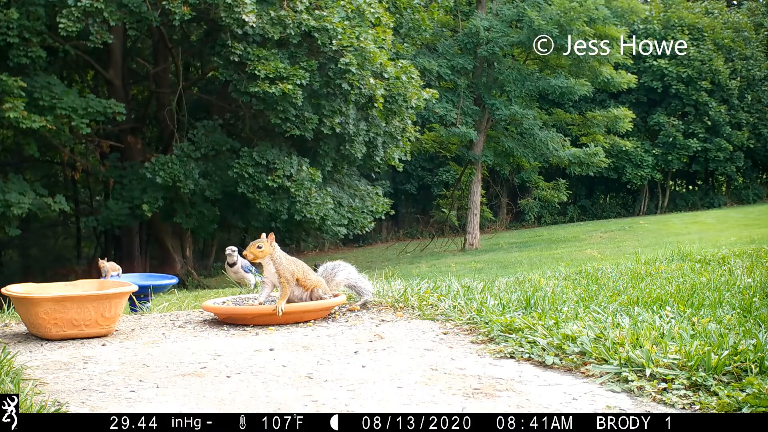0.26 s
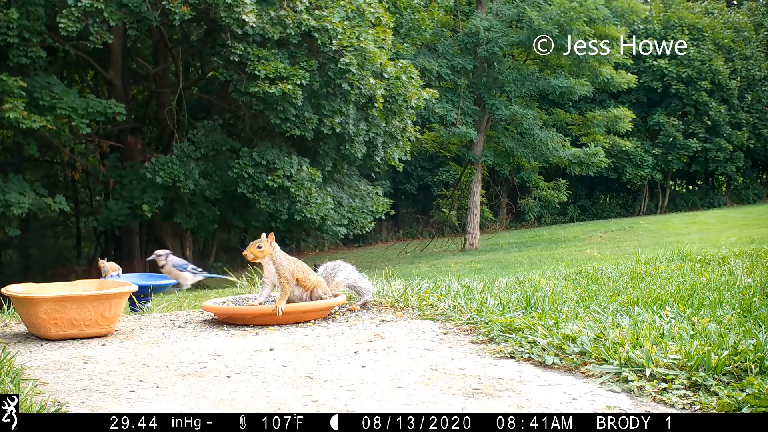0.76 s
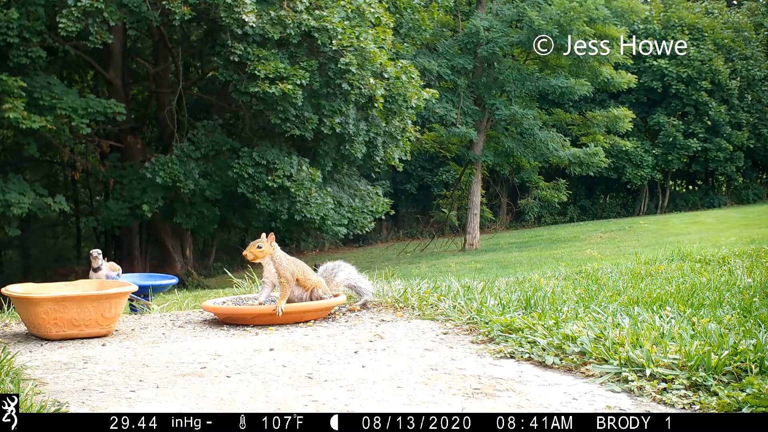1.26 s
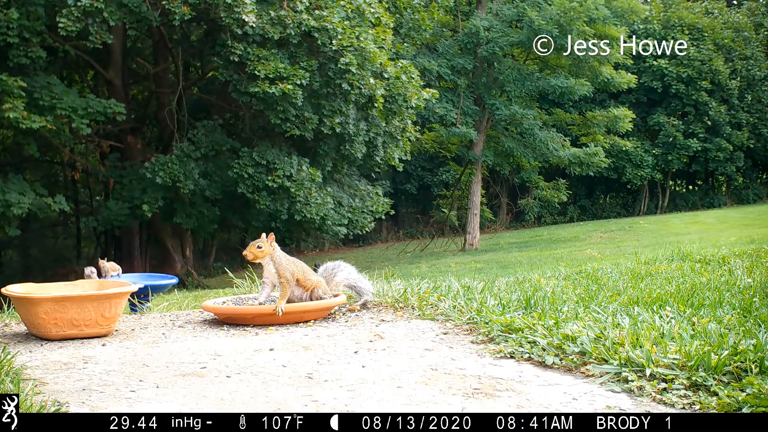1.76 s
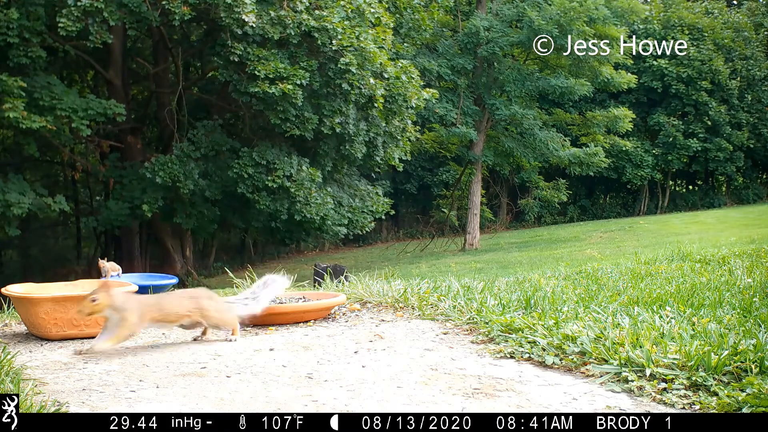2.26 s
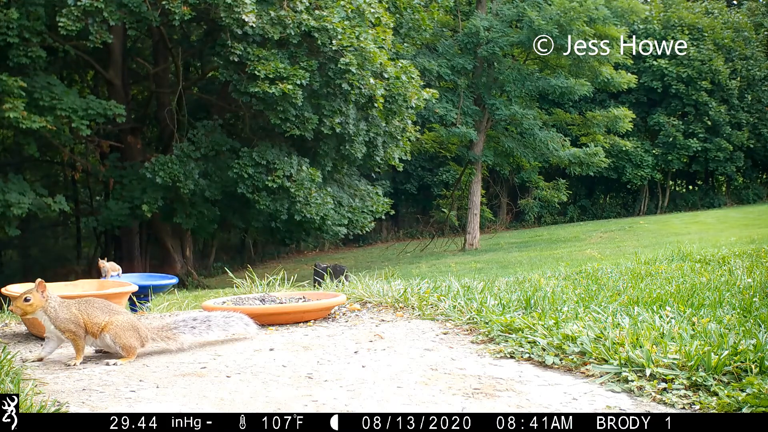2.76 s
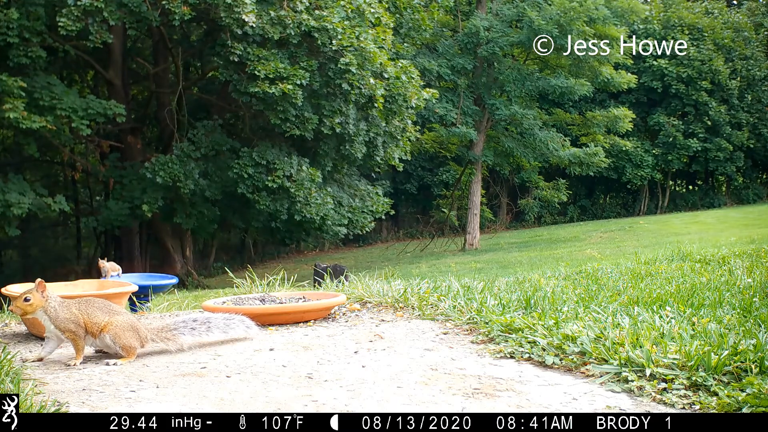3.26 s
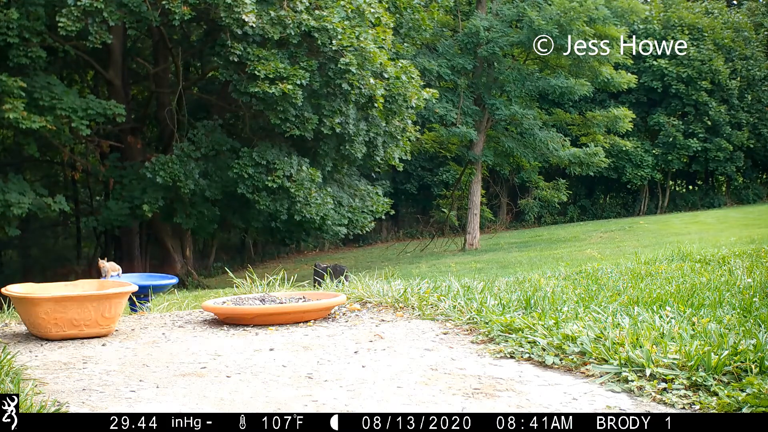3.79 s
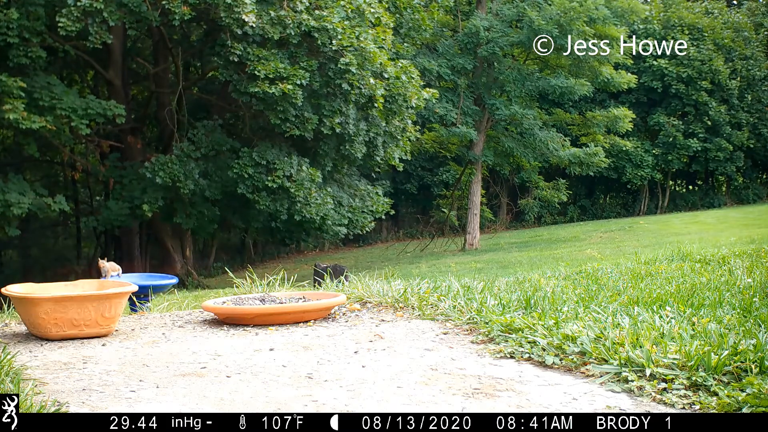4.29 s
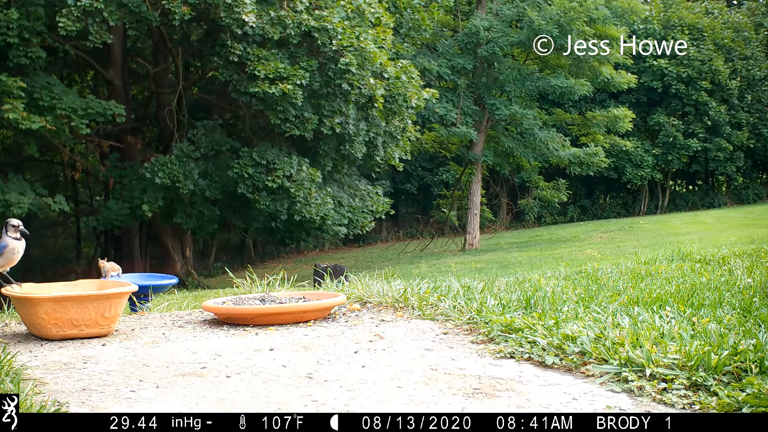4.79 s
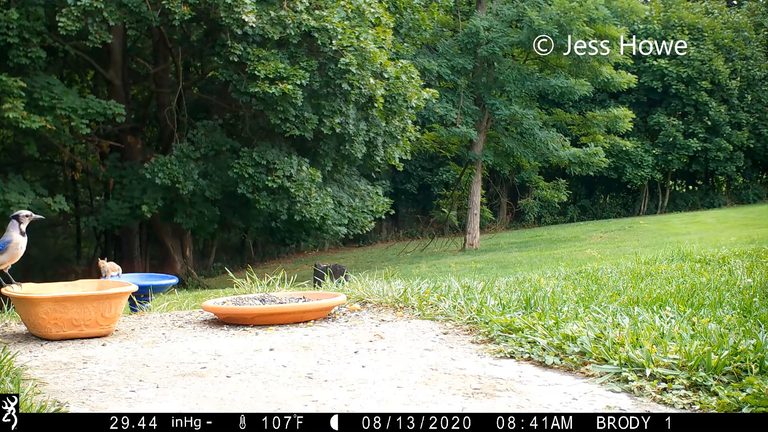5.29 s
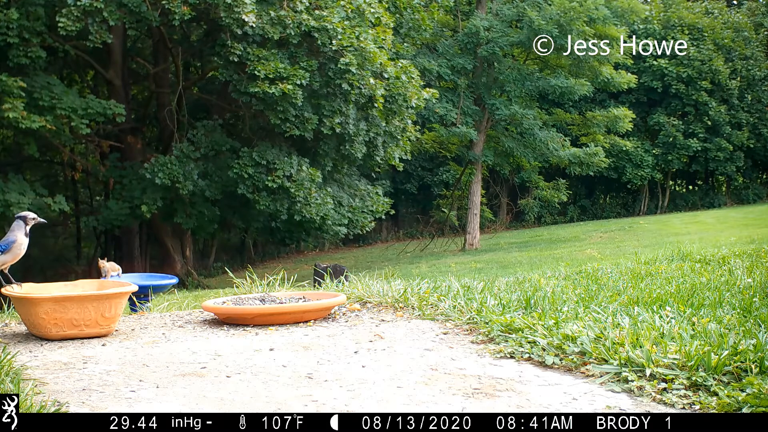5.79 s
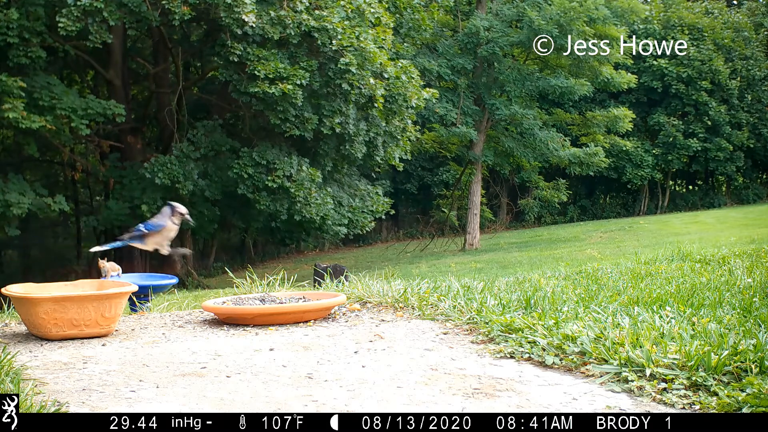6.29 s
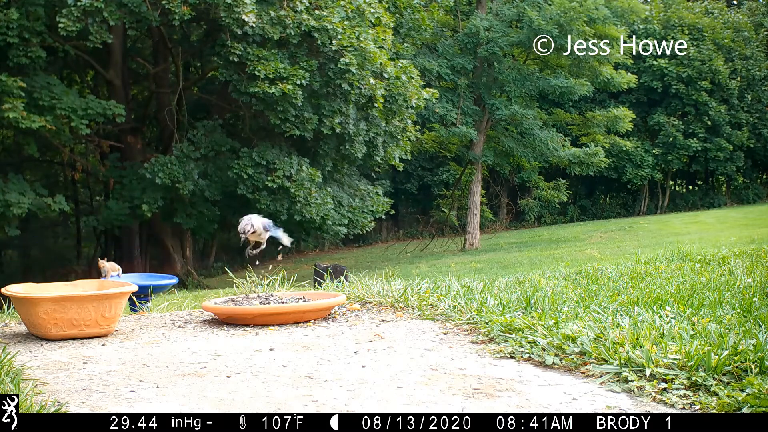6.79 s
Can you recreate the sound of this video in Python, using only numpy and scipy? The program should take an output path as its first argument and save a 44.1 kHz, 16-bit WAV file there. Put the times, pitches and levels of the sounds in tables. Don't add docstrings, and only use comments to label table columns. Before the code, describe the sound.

A quiet yard at a wood's edge, heard through a small, easily overloaded microphone. At 0 seconds the tail of a harsh jay scream is already sounding, ending abruptly by 0.1 and leaving a woody echo. From 0.2 to 1.5 a distant songbird whistles thin, down-stepping phrases, softened by echo. A faint far-engine throb swells near 1.7. At 2.0 to 2.5 soft throaty clucks and quick dry claw scratches come from the bowls, with another low note at 2.65. At 3.2 the jay screams again for a third of a second, starting hesitantly and swelling, with a tiny thump inside. Distant whistles return from 3.75 to 4.4 and 5.5 to 6.7; the engine murmurs weakly around 5.2. After a slight scratch and stutter, the loudest, crackling scream hits at 6.43 to 6.74. Another scratch and faint whistle close at 7. Leaves and traffic hush throughout.

```python
import sys
import numpy as np
from scipy import signal
from scipy.fft import rfft, irfft
from scipy.io import wavfile
from scipy.ndimage import uniform_filter1d

SR = 44100
rng = np.random.default_rng(int(sys.argv[2]) if len(sys.argv) > 2 else 0)


def ratio_of_db(decibels):
    return 10 ** (np.asarray(decibels, float) / 20)


def generate_wav(signal):
    frames = np.transpose(np.atleast_2d(signal))
    scaled = np.clip(frames, -1, 1) * 32767
    pcm = np.round(scaled).astype(np.int16)
    wavfile.write(sys.argv[1], SR, pcm)


N = 310904
LEAD = SR // 2

# start in seconds, end in seconds.
SPANS_S = [
    (-.27, .078),
    (3.2295, 3.568),
    (6.4345, 6.74),
]


def colour(x, points, share=1):
    hz, db = np.transpose(points)
    f = np.maximum(np.fft.rfftfreq(len(x), 1 / SR), 1)
    gain = ratio_of_db(share * np.interp(np.log(f), np.log(hz), db))
    return irfft(rfft(x) * gain, len(x))


def unit(x):
    return x / np.sqrt(np.mean(x ** 2))


def band(hz, width, size):
    f = np.fft.rfftfreq(size, 1 / SR)
    spectrum = rfft(rng.standard_normal(size)) / np.sqrt(1 + ((f - hz) / width) ** 4)
    return unit(irfft(spectrum, size))


def add(out, s, x):
    i = int(s * SR) + LEAD
    out[i:i + len(x)] += x[:len(out) - i]


def wood(x, t60_s, rise_s):
    t = np.arange(int(1.2 * SR)) / SR
    trunks = ratio_of_db(band(0, 71, len(t)))
    leaves = [(500, -7), (3300, -6.5), (4200, 3.5), (5000, -6), (6500, -3.5), (8000, -15.5),
              (10000, -32.5), (16000, -51)]
    tail = colour(rng.standard_normal(len(t)), leaves) * trunks
    tail = tail * ratio_of_db(-60 * t / t60_s) * (1 - np.exp(-t / rise_s))
    return signal.fftconvolve(x, tail / np.sqrt(np.sum(tail ** 2)))[:len(x)]


def murmur():
    # frequency in Hz, level in dB per Hz.
    air_spectrum = [(12, -47), (20, -22.5), (119, -4.5), (232, -3), (500, -4), (985, -3.5), (2760, -14.5),
                    (3800, -24), (4810, -31), (7300, -35.5), (8640, -46), (15500, -48.5)]
    return unit(colour(rng.standard_normal(N), air_spectrum)) * ratio_of_db(-51.5 + .5 * band(0, 1.8, N))


def engine(t):
    # centre in seconds, half length in seconds, level in dB.
    swells = [
        (1.664, .13, -46),
        (4.45, 0.11, -55.5),
        (5.243, 0.53, -59),
    ]
    swell = ratio_of_db(-61.5) + sum(ratio_of_db(db) * np.exp(-((t - s) / half_s) ** 2) for s, half_s, db in swells)
    return band(270, 90, N) * swell * ratio_of_db(2.5 * band(0, 25, N) - 4.5)


def whine(t):
    whine_hz, flip_hz, whine_db = 7797.5, 59.5, -75.5
    flips = np.clip(8 * np.sin(np.pi * flip_hz * (t - .0093)), -1, 1)
    return np.sqrt(2) * ratio_of_db(whine_db) * flips * np.sin(2 * np.pi * whine_hz * t)


def yard():
    t = np.arange(N) / SR
    return murmur() + engine(t) + whine(t)


def songbird():
    # start in seconds, length in seconds, pitch in Hz, level in dB.
    song = [(0.2, 0.13, 2850, -56.5), (0.372, 0.073, 2153, -49.5), (0.331, 0.18, 3880, -79.5),
            (0.512, 0.088, 3340, -65), (0.57, 0.15, 2677, -61), (0.705, 0.14, 2062, -57.5),
            (0.965, 0.19, 3854, -82), (1.132, 0.14, 3380, -70), (1.15, 0.21, 2790, -62.5),
            (1.288, 0.07, 2227, -55), (1.396, 0.08, 2180, -59), (3.75, 0.12, 2750, -56.5),
            (3.855, 0.16, 2128, -59), (3.955, 0.28, 3370, -61), (4.197, 0.11, 2846, -66.5),
            (4.327, 0.058, 2200, -59.5), (5.547, 0.15, 3900, -77), (5.698, 0.074, 3370, -71),
            (5.74, 0.18, 2810, -58), (5.92, 0.14, 2183, -55), (5.981, 0.38, 3866, -82.5),
            (6.192, 0.1, 2747, -57.5), (6.24, 0.51, 2842, -60), (6.33, 0.31, 2065, -59),
            (6.967, 0.075, 2710, -56.5)]
    # start in seconds, length in seconds, pitch in Hz, level in dB.
    risers = [
        (0.453, 0.16, 1383, -60),
        (1.157, 0.053, 1646, -59.5),
    ]
    high_slide, low_slide, riser_slide = -0.3, -0.077, 1.0
    whistles = [(*n, high_slide if n[2] > 3000 else low_slide) for n in song]
    whistles += [(*n, riser_slide) for n in risers]
    out = np.zeros(N + LEAD)
    for s, length_s, pitch_hz, db, slide in whistles:
        u = np.linspace(0, 1, int(length_s * SR))
        high = pitch_hz > 3600
        buzz_hz = 55 if high else 12
        hz = pitch_hz * (1 + slide * length_s * (u - .5)) + buzz_hz * band(0, 82, len(u))
        shape = np.sin(np.pi * u ** 0.85) ** 0.38 * ratio_of_db(1.7 * band(0, 30, len(u)))
        add(out, s, ratio_of_db(db + 5 + 10 * high) * shape * np.sin(2 * np.pi * np.cumsum(hz) / SR))
    return out + ratio_of_db(-2) * wood(out, 0.72, 0.0074)


def throat_notes(out):
    # start in seconds, length in seconds, pitch in Hz, level in dB.
    chucks = [
        (2.011, 0.04, 762, -47),
        (2.081, 0.057, 750, -52),
        (2.11, 0.042, 1370, -58.5, ),
        (2.652, 0.052, 559, -55),
    ]
    harmonics = [(1, -5), (2, -5), (3, 3), (4, -7), (5, -12)]  # (multiple, dB)
    for s, length_s, hz, db in chucks:
        u = np.arange(int(length_s * SR)) / SR
        note = sum(ratio_of_db(g_db) * np.sin(2 * np.pi * k * hz * u) for k, g_db in harmonics if k * hz < 4500)
        swell = np.sin(np.pi * u / length_s) * ratio_of_db(2 * band(0, 114, len(u)))
        add(out, s, ratio_of_db(db) * note * swell)


def scuffle(out):
    # start in seconds, length in seconds, centre in Hz, level in dB.
    scratches = [(2.026, 0.028, 2180, -44.5), (2.075, 0.055, 2700, -51), (2.107, .012, 4000, -64),
                 (2.117, 0.042, 1410, -47.5), (2.15, 0.019, 2500, -56), (2.202, 0.013, 3480, -64),
                 (2.223, 0.0184, 2580, -53), (2.314, 0.041, 2160, -53), (2.405, 0.033, 1790, -50),
                 (2.474, 0.013, 2500, -65), (6.183, 0.023, 3494, -56), (6.983, 0.052, 2400, -45.5)]
    for s, length_s, hz, db in scratches:
        size = int(length_s * SR)
        swell = np.hanning(size) ** .5 * ratio_of_db(1.1 * band(0, 200, size))
        add(out, s, ratio_of_db(db) * band(hz, 0.39 * hz, size) * swell)


def jolt(out):
    # start in seconds, length in seconds, thump in dB, fizz in dB.
    jolt_row = (3.412, .016, -38, -62)
    s, length_s, thump_db, fizz_db = jolt_row
    size = int(length_s * SR)
    thump = np.cos(2 * np.pi * 90 * (np.arange(size) - size / 2) / SR)
    fizz = band(15000, 2000, size)
    add(out, s, np.hanning(size) * (ratio_of_db(thump_db) * thump + ratio_of_db(fizz_db) * fizz))


def feeder():
    out = np.zeros(N + LEAD)
    throat_notes(out)
    scuffle(out)
    out = colour(out, [(3500, -1), (6000, -5), (9000, -17)])
    jolt(out)
    return out


def stutter(out):
    # start in seconds, level in dB, length in seconds, pitch in Hz.
    catches = [
        (3.2243, -29, .0035, 2050),
        (6.4247, -24, .004, 2150),
        (6.4303, -17, .004, 2200),
    ]
    for s, db, length_s, hz in catches:
        u = np.arange(int(length_s * SR)) / SR
        ring = np.sin(2 * np.pi * hz * u) + 0.12 * np.sin(2 * np.pi * 2.4 * hz * u)
        ring = ring + 0.13 * band(4800, 1200, len(u))
        add(out, s, ratio_of_db(db + 1.5) * ring * np.sin(np.pi * u / length_s) ** .8)


def syrinx(t):
    # time in seconds, held pitch in Hz, level in dB.
    efforts = [
        [(-.24, 888.8, -7), (-.1, 831.4, -9.5), (0.0, 812, -10.5), (0.03, 792.8, -10), (0.07, 765, -10)],
        [(3.229, 888.4, -29.5), (3.245, 881.3, -21.5), (3.275, 891.4, -13), (3.305, 865.4, -17),
         (3.34, 852.5, -12), (3.385, 849.4, -13), (3.415, 821.8, -9.5), (3.495, 821, -12), (3.55, 785, -15)],
        [(6.434, 874.3, -16.5), (6.452, 872.3, -16), (6.478, 894.7, -7), (6.505, 860.7, -5), (6.57, 834, -5.5),
         (6.65, 828, -4.5), (6.69, 802.4, -6), (6.73, 778, -7.5)],
    ]
    # lost to overload in dB, echo in dB, untuned level in dB, scoop in seconds, collapse in seconds.
    wholes = [
        (4.5, -25.5, -9, -.27, .079),
        (0, -18, -15, 3.229, 3.567),
        (-1, -29.5, -8, 6.431, 6.737),
    ]
    # centre in seconds, half length in seconds, strength.
    flutter = (3.337, .018, .15)
    second_top, second_start_hz = (.45, .45, .27), (135, 70, 210)
    second_end_hz = 135
    scoop_half_s, scoop_hz = .0105, 385
    drop_s, drop_shape, drop_hz, drop_db = .013, 1.5, 185, -23
    drop_lift = .35
    breath, catch, catch_s, tiring, collapse = .014, .24, .016, .085, .14
    times, *columns = np.transpose(np.vstack(efforts))
    hz, db = (uniform_filter1d(np.interp(t, times, c), size=300) for c in columns)
    gate, echo, gained_db, drop, rasp, strength, below_hz, tired, opening, centre_s = np.zeros((10, len(t)))
    for (start, end), whole, apart_hz, top in zip(SPANS_S, wholes, second_start_hz, second_top):
        over_db, echo_db, plain_db, scoop_s, fall_s = whole
        inside, age = (t >= start) & (t <= end), t - start
        done = inside * age / (end - start)
        falling = inside * np.exp(-(np.maximum(fall_s - t, 0) / drop_s) ** drop_shape)
        scoop = inside * np.exp(-((t - scoop_s) / scoop_half_s) ** 2)
        hz = hz - scoop_hz * scoop - drop_hz * falling
        drop += falling ** 1.4
        gained_db += (inside - scoop) * np.maximum(db + drop_lift * drop_db * falling - plain_db, -6)
        opening += inside * np.exp(-((t - scoop_s - .013) / 0.013) ** 2)
        tired += done ** 5
        rasp += inside * (breath + catch * np.exp(-(age / catch_s) ** 4))
        rasp += tiring * done ** 2.5 + collapse * falling
        strength += top * done ** 2.6
        closing = np.clip(1 - done / .8, 0, 1)
        below_hz += inside * (second_end_hz + (apart_hz - second_end_hz) * closing)
        edge = np.clip(np.minimum((t - start) / .001, (end - t) / 0.0051), 0, 1)
        gate += edge * ratio_of_db(over_db * np.clip((db + 7.5) / 4, 0, 1))
        echo += edge * ratio_of_db(echo_db)
        centre_s[edge > 0] = (start + end) / 2
    flutter_s, half_s, flutter_strength = flutter
    strength += flutter_strength * np.exp(-((t - flutter_s) / half_s) ** 2)
    strength = strength * ratio_of_db(1.7 * band(0, 34, len(t)))
    level = ratio_of_db(db + drop_db * drop)
    return hz, level, gate, echo, gained_db, rasp, strength, below_hz, tired, opening, centre_s


def jay():
    # multiple of the pitch, level in dB.
    partials = [
        [(1, -28.5), (2, -13.5), (3, -13), (4, 0.5), (5, -22.5), (6, -37.5), (7, -37.5), (8, -32.5), (9, -42.5),
         (10, -45.5), (11, -44.5), (12, -48.5), (13, -55.5), (14, -56.5), (15, -53), (16, -49.5)],
        [(1, -38.5), (2, -19.5), (3, -13.5), (4, -2.5), (5, -27.5), (6, -30), (7, -34.5), (8, -34.5),
         (9, -44.5), (10, -49.5), (11, -48), (12, -53), (13, -62.5), (14, -61), (15, -58), (16, -73), (17, -66),
         (18, -69)],
        [(1, -31.5), (2, -20), (3, -11), (4, 0.5), (5, -24), (6, -44), (7, -47.5), (8, -42), (9, -48),
         (10, -44.5), (11, -39.5), (12, -32.5), (13, -45), (14, -46), (15, -58), (16, -55)],
    ]
    low_lag, high_lag = 1.2, .6
    fifth_db_per_hz, open_db = .08, 7
    shake_hz, fading_db = 8, 2.6
    t = (np.arange(N + LEAD) - LEAD) / SR
    size = len(t)
    hz, level, gate, echo, gained_db, rasp, strength, below_hz, tired, opening, centre_s = syrinx(t)
    beat = 2 * np.pi * np.cumsum(below_hz * (1 + 0.071 * band(0, 20, size))) / SR
    shaken_hz = hz * (1 + .001 * band(0, 40, size)) + shake_hz * tired * band(0, 300, size)
    phase = 2 * np.pi * np.cumsum(shaken_hz) / SR
    sagging = np.clip((770 - hz) / 70, 0, 1)
    fifth_db = fifth_db_per_hz * (1 - opening) * np.minimum(830 - hz, 130)
    middles = [(start + end) / 2 for start, end in SPANS_S]
    voice = 0
    for k in range(1, 19):
        part_db = np.interp(centre_s, middles, [dict(p).get(k, -70) for p in partials])
        tilt_db = -gained_db * (low_lag if k < 4 else high_lag if k > 4 else 0)
        tilt_db = tilt_db - 8 * sagging * (k > 8) + fifth_db * (k == 5) + open_db * opening * (k > 5)
        share = 1 if k == 4 else .4
        wander = ratio_of_db((fading_db if k > 5 else 1.2 * (k != 4)) * band(0, 23, size))
        smear = wander + rasp * max(k / 4, 1) * band(0, 560, size)
        turn = k * phase + .6 * k * k
        lines = np.sin(turn) + share * strength * np.sin(turn - beat)
        voice = voice + ratio_of_db(part_db + tilt_db) * smear * lines
    voice = np.sqrt(2) * voice * level
    near = voice * gate
    stutter(near)
    return near + wood(voice * echo, t60_s=0.68, rise_s=0.018)


def scene():
    return (yard() + (songbird() + feeder() + jay())[LEAD:])[None]


def overload(x):
    # frequency in Hz, gain in dB.
    crackle_points = [(20, -17), (1200, -24), (2700, 2), (3000, -1), (3600, 1.5), (3950, -14.5),
                      (6000, -25.5), (10000, -13), (12000, -12), (16000, -19.5)]
    # frequency in Hz, gain in dB.
    grit_points = [(20, 1), (150, 4), (900, 1.5), (1500, -4.5), (4500, -16), (6000, -20), (10000, -21.5),
                   (11500, -23), (15500, -18)]
    clip_db, sag_db = -5, -12
    cut = np.pad(np.clip(x, -ratio_of_db(clip_db), ratio_of_db(clip_db)) - x, (0, LEAD))
    excess = np.maximum(uniform_filter1d(np.abs(cut), size=130), 0)
    grit = colour(excess ** .5 * rng.standard_normal(len(cut)), grit_points) / 3
    bias = [(5, -39.5), (60, -5), (140, 3), (400, -7.5), (1000, -38.5)]
    sag = ratio_of_db(sag_db) * colour(excess, bias)
    return x + (colour(cut, crackle_points) + grit + sag)[:N]


def treble_dropouts(x):
    dropouts_s = [
        1.0,
        1.467,
        1.83,
        2.13,
        2.662,
        3.432,
        3.516,
        4.665,
        5.335,
        5.715,
    ]
    t = np.arange(N) / SR
    duck = sum(np.exp(-((t - s) / 0.009) ** 4) for s in dropouts_s)
    treble = colour(x, [(3600, -40), (3950, -2), (4600, 0), (7400, 0), (7700, -8), (8200, 0)])
    return x - .6 * duck * treble


def top_cut(x):
    return signal.sosfilt(signal.butter(12, 15950, fs=SR, output="sos"), x)


def record(dry):
    heard = treble_dropouts(overload(dry[0]))
    return top_cut(heard[None])


dry = scene()
out = record(dry)
generate_wav(out)
```